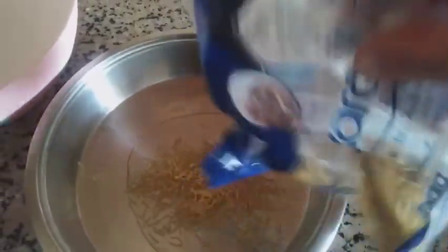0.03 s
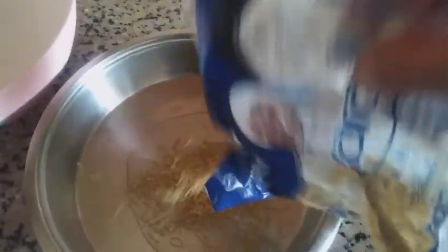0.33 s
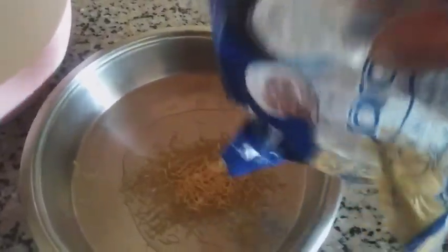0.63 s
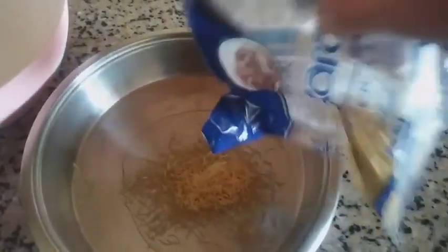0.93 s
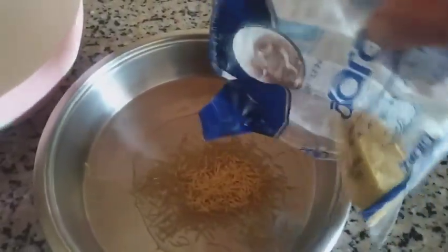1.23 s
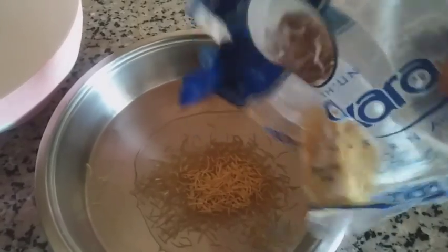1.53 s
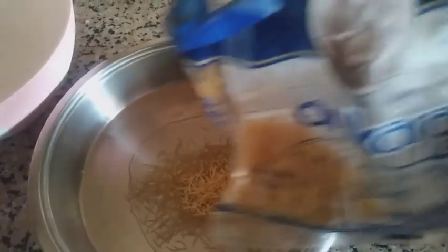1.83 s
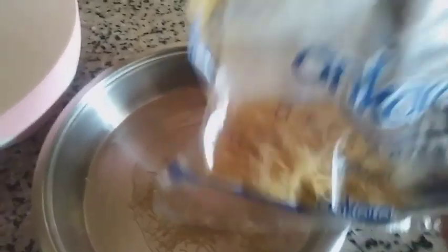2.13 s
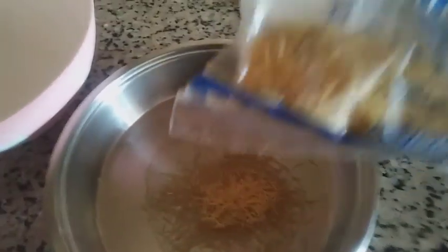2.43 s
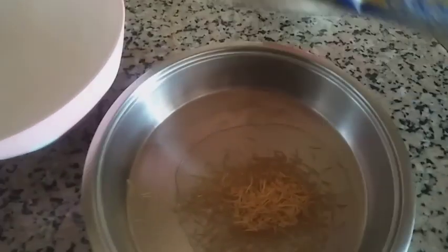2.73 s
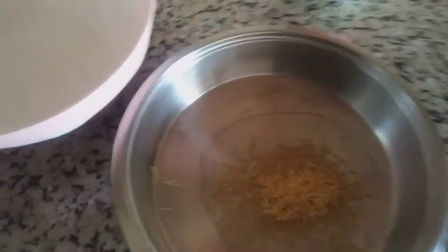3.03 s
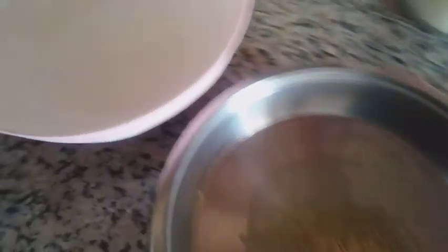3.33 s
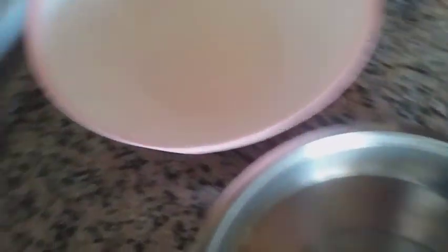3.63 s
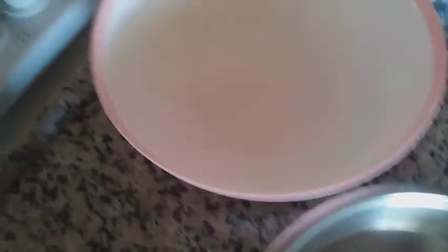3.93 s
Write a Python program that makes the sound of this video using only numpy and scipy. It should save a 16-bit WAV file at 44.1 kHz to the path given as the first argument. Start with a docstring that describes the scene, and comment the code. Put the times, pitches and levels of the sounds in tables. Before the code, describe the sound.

Close up in a small kitchen, dry noodles rattle in short bursts into a lightly ringing steel pan. The plastic bag crackles, leftover noodles slide back inside it, and it drops onto a stone counter.

```python
"""A small kitchen with hard walls, one microphone close to a steel pan; an appliance hums faintly.
Dry noodles are shaken from a plastic bag, each shake a swarm of tiny contacts that rings the pan.
The bag is tipped upright and the rest slides back; the film crinkles, snaps and knocks
as it is carried. Then the bag lands on the stone counter and its contents settle."""
import sys
import numpy as np
from scipy import signal
from scipy.fft import rfft, irfft
from scipy.io import wavfile
from scipy.ndimage import uniform_filter1d

SR = 44100
rng = np.random.default_rng(int(sys.argv[2]) if len(sys.argv) > 2 else 0)


def digitize_waveform(pressure):
    """Quantize a signal to 16-bit integers and store it at the path in sys.argv[1].

    Rows of a 2-D input are taken as channels; values are limited to [-1, 1].
    """
    field = np.atleast_2d(pressure).T
    bounded = np.clip(field, -1, 1)
    quanta = np.round(bounded * 32767).astype(np.int16)
    wavfile.write(sys.argv[1], SR, quanta)


N = 176400
T = np.arange(N) / SR

# Levels in a table are relative to one another; each source then sets its own gain.
# Shakes of the bag, a slide and then a rush: rush_s, rush_db, slide_db, rush_half_length_s
BAG_SHAKES = [(0.161, -14.5, -20.5, 0.016), (0.354, -15, -22.5, 0.021), (.548, -14.5, -19.5, 0.017),
              (0.741, -21, -23, 0.013), (0.906, -20.5, -26, 0.011), (1.072, -20, -25, 0.018),
              (1.206, -25.5, -43, 0.0098)]
# Trickle between the shakes: time_s, level_db
TRICKLE_CURVE = [(0, -20.5), (.04, -24.5), (.44, -23), (.62, -28), (.79, -29.5), (.87, -25.5), (.95, -28.5),
                 (1.16, -27.5), (1.25, -36.5), (1.35, -37), (1.42, -57)]
# Modes of the steel pan: pitch_hz, width_hz, level_db
STEEL_MODES = [(724, 54, -17), (1290, 63, 3.5), (1600, 48, 1.5), (2240, 78, -6), (3110, 150, -1.5),
               (3570, 110, -6), (4070, 200, -5), (4400, 260, -0.5), (4880, 110, -2), (5530, 90, -1)]
# Snaps of the film and two soft, low knocks:
# start_s, level_db, pitch_hz, second_pitch_hz, second_ring_db, thud_db
SNAPS_AND_KNOCKS = [(0.497, -5.5, 3200, 2250, -8, -31), (0.727, -14, 4410, 2150, 2, -33),
                    (1.159, -25, 4400, 3100, -4, -47), (1.191, -17, 2940, 2290, 1, -36),
                    (1.296, -8.5, 2280, 4840, 4, -52), (1.325, -23.5, 1250, 4070, -3, -20.5),
                    (1.35, -21.5, 1950, 990, -4.5, -25), (1.403, -17.5, 2180, 2070, -5, -51),
                    (1.454, -29.5, 1830, 1250, 1, -32), (1.489, -15, 2240, 1570, -7, -37),
                    (1.569, -35, 270, 2320, -7, -16), (1.589, -18, 2050, 3120, -0.5, -37),
                    (1.671, -30.5, 324, 555, -2.5, -13), (1.814, -9.5, 2330, 2720, -5, -50),
                    (1.826, -12, 3110, 3700, -4, -42), (1.929, -9, 2140, 2400, -9, -54),
                    (2.372, -6.5, 2500, 3380, 0, -36), (2.384, -24, 2150, 810, -6, -15),
                    (2.408, -16, 1600, 4700, -8, -34), (2.447, -18.5, 1890, 1390, -1, -23),
                    (2.583, -11.5, 4200, 1720, -3.5, -31), (2.601, -14, 1840, 5240, -4, -24),
                    (2.622, -7, 2100, 1600, -3.5, -34), (2.793, -10, 3060, 1780, -3, -24),
                    (2.843, -16.5, 4540, 2200, -1, -36), (2.858, -20.5, 2530, 1750, -5, -28),
                    (2.926, -21, 3700, 4600, -3, -27), (2.946, -18, 2040, 3800, 1, -30),
                    (3.021, -16, 3310, 4260, -7, -22.5), (3.06, -19, 1620, 2590, -1, -20.5),
                    (3.126, -18.5, 3600, 2200, 1, -45), (3.15, -19.5, 1730, 3600, 1, -42),
                    (3.292, -19.5, 3800, 2900, -4, -36), (3.349, -21.5, 2800, 5680, 3.5, -45),
                    (3.41, -17, 1430, 2750, -3.5, -19), (3.494, -19.5, 2600, 4000, 1, -26),
                    (3.562, -15.5, 1690, 4100, -2, -32)]
# Flexes of the film: centre_s, level_db, half_length_s
FILM_FLEXES = [(1.297, -32, .003), (1.352, -42, 0.013), (2.423, -31, 0.014), (2.625, -38.5, 0.02),
               (2.792, -37.5, 0.0067), (2.862, -39.5, 0.02), (2.957, -31, 0.012), (3.046, -30.5, 0.02),
               (3.103, -35.5, 0.012), (3.16, -34, 0.024), (3.251, -34.5, 0.019), (3.335, -42.5, 0.017),
               (3.424, -44, .02), (3.499, -36, 0.0051), (3.77, -31, 0.0057), (3.846, -39.5, 0.018),
               (3.972, -46.5, 0.011)]
# Noodles sliding inside the raised bag: time_s, level_db
SLUMP_CURVE = [(1.46, -60), (1.55, -37.5), (1.66, -32), (1.71, -29.5), (1.78, -26.5), (1.85, -23.5),
               (1.905, -25), (1.945, -22.5), (2.005, -32), (2.09, -19), (2.155, -17), (2.22, -21.5),
               (2.272, -34), (2.33, -25.5), (2.43, -35), (2.48, -36), (2.62, -39.5), (2.68, -57)]
# Resonance of the bag's hollow, sinking as it fills: time_s, pitch_hz
HOLLOW_PITCH = [(1.7, 2370), (2.0, 2430), (2.15, 1930), (2.25, 1720), (2.6, 1720)]
# Clumps tumbling to the bottom of the bag: centre_s, level_db, half_length_s
CLUMP_FALLS = [(1.706, -26, 0.008), (1.821, -23.5, .007), (1.87, -27.5, 0.014), (1.938, -28, 0.0048),
               (2.148, -20, 0.019), (2.222, -24.5, 0.016)]

# Tone of each source: frequency_hz, gain_db
AIR_TONE = [(25, 12), (60, -4.5), (150, 0), (350, 5.5), (550, -7), (720, 2), (1000, -8.5), (1600, -3),
            (4000, -6.5), (9000, -9), (15000, -6)]  # room air
SLIDE_TONE = [(100, -28), (280, -15), (450, -14), (950, -8.5), (1550, -5.5), (2100, 2.5), (3100, 1),
              (3650, -3), (4400, 2), (5600, -3.5), (9000, -5), (15000, -5.5)]  # noodles sliding over film
RUSH_TONE = [(100, -33), (280, -14), (450, -18), (950, -5.5), (1550, -5), (2100, 2.5), (3800, 1.5),
             (5600, 0), (9000, -4.5), (15000, -2)]  # noodles rushing into the pan
SNAP_TONE = [(150, -24), (800, -6), (2000, 5.5), (4800, 2), (9000, -3.5), (15000, -16)]  # crack and flutter of the film
FILM_TONE = [(100, -14), (300, -2), (600, -8), (1150, -4), (1550, 3), (2600, -1), (4000, 3), (5600, -6.5),
             (9000, -5), (15000, -11)]  # rustling film
SLUMP_TONE = [(100, -32), (280, -18), (550, -13), (900, -5), (1200, -7), (1700, -0.5), (2900, -1.5),
              (4400, 2), (5600, -2), (9000, -2), (15000, -2.5)]  # noodles running back
CLUMP_TONE = [(100, -22), (300, -15), (600, -8.5), (900, 0), (1600, -1), (2400, 5), (4000, -10),
              (12000, -15)]  # falling clumps
LANDING_TONE = [(40, -47), (110, -33), (210, -3), (430, -5.5), (650, -2), (1100, -6), (1600, 4), (2600, 0),
                (4100, 1.5), (5600, -3.5), (9000, -3.5), (15000, -5)]  # bag on stone
# The microphone, whose port cancels the upper treble: frequency_hz, gain_db
MIC_RESPONSE = [(25, -25), (55, -7), (110, 0), (5500, 0.5), (6400, -4.5), (6950, -12), (7320, -25.5),
                (7700, -16.5), (8500, -16), (11500, -19), (15500, -23)]


def from_db(db):
    """Decibels to gain."""
    return 10 ** (np.asarray(db) / 20)


def rms_one(x):
    """Scale to unit rms."""
    return x / np.sqrt(np.mean(x ** 2) + 1e-20)


def level(curve):
    """Gain along a (time_s, level_db) curve, opening 30 ms early and silent after its end."""
    times, db = np.transpose(curve)
    return from_db(np.interp(T, times, db)) * (T >= times[0] - .03) * (T <= times[-1])


def swell(centre_s, db, half_s):
    """Power of a bell-shaped swell."""
    return from_db(db) ** 2 * np.exp(-.5 * ((T - centre_s) / half_s) ** 2)


def decay(t, t60_s):
    """Exponential decay from time zero, full level before it."""
    return from_db(-60 * np.maximum(t, 0) / t60_s)


def colour(x, tone):
    """Minimum-phase filter through (frequency_hz, gain_db) points."""
    hz, db = np.transpose(tone)
    grid_hz = np.maximum(np.fft.rfftfreq(8192, 1 / SR), 1)
    gain = from_db(np.interp(np.log(grid_hz), np.log(hz), db))
    cepstrum = irfft(np.log(gain))
    half = len(cepstrum) // 2
    cepstrum[1:half] *= 2
    cepstrum[half + 1:] = 0
    impulse = irfft(np.exp(rfft(cepstrum)))[:half]
    return signal.oaconvolve(x, impulse)[:len(x)]


def resonance(x, hz, width_hz):
    """Two-pole resonance with unit gain at its peak."""
    radius = np.exp(-np.pi * width_hz / SR)
    feedback = [1, -2 * radius * np.cos(2 * np.pi * hz / SR), radius ** 2]
    return signal.lfilter(np.array([1, 0, -1]) * (1 - radius ** 2) / 2, feedback, x + 1e-18)


def contacts(tone, per_s, spread_db, q, click=.25):
    """A steady swarm of tiny contacts of random size, each ringing briefly, high pitches more often."""
    pitches_hz = np.geomspace(250, 14000, 16)
    share = pitches_hz ** .6 / np.sum(pitches_hz ** .6)
    sizes = from_db(spread_db * np.minimum(rng.exponential(1, N), 4)) * rng.choice([-1, 1], N)
    clicks = sizes * (rng.random(N) < per_s / SR)
    pitch_index = np.searchsorted(np.cumsum(share), rng.random(N))
    rings = sum(resonance(clicks * (pitch_index == k), hz, hz / q) / np.sqrt(share[k])
                for k, hz in enumerate(pitches_hz))
    swarm = colour(rings + click * clicks, tone)
    power_at_mic = uniform_filter1d(colour(swarm, MIC_RESPONSE) ** 2, size=1300)
    return swarm / np.sqrt(power_at_mic + power_at_mic.mean() / 20)


def room_tone(hum_hz=98):
    """Room air and the wavering hum of an appliance, behind everything else."""
    waver = rms_one(resonance(rng.standard_normal(N), hum_hz, width_hz=9.9))
    hum = np.sqrt(2) * np.sin(2 * np.pi * hum_hz * T) + 0.7 * waver
    air = rms_one(colour(rng.standard_normal(N), AIR_TONE))
    return from_db(-44.5) * air + from_db(-59.5) * hum


def noodle_pour(slide_lead_s=0.061):
    """Each shake slides noodles over the film, then they rush into the ringing pan; single ends tick."""
    slide_power = level(TRICKLE_CURVE) ** 2
    slide_power += sum(swell(s - slide_lead_s, db, half_s=0.021) for s, _, db, _ in BAG_SHAKES)
    rush_power = sum(swell(s, db, half_s) for s, db, _, half_s in BAG_SHAKES)
    slides = np.sqrt(slide_power) * contacts(SLIDE_TONE, per_s=9000, spread_db=2.5, q=3.5, click=0.66)
    rushes = np.sqrt(rush_power) * contacts(RUSH_TONE, per_s=9000, spread_db=2.5, q=2.8, click=0.73)
    ticks = np.sqrt(slide_power) * contacts(SLIDE_TONE, per_s=420, spread_db=3, q=7, click=0.34)
    noodles = slides + rushes + from_db(-5.5) * ticks
    pan = sum(from_db(db) * resonance(noodles, hz, width_hz) for hz, width_hz, db in STEEL_MODES)
    return from_db(-2) * (noodles + from_db(-3.5) * pan)


def snaps_and_knocks(snap_delay_s=0.001686, rise_s=0.00058, crack_s=0.0016, ring_cycles=22.5):
    """The film snaps or knocks: a crack, two short rings of its panels, a flutter and a soft thud."""
    track, t = np.zeros(N + SR), T[:SR // 8]
    rise = 1 - np.exp(-(t / rise_s) ** 2)
    for start_s, db, hz, second_hz, second_db, thud_db in SNAPS_AND_KNOCKS:
        crack, flutter, thud = rng.standard_normal((3, len(t)))
        ring = np.sin(2 * np.pi * hz * t) + from_db(second_db) * np.sin(2 * np.pi * second_hz * t)
        ring *= decay(t, t60_s=ring_cycles / np.sqrt(hz * second_hz))
        crack *= from_db(-14.5) * np.exp(-t / crack_s)
        flutter *= from_db(-18.5) * decay(t, t60_s=0.045)
        burst = 2 * colour(crack + flutter, SNAP_TONE)
        for _ in range(2):
            thud = resonance(thud, hz=290, width_hz=440)
        thud = from_db(thud_db + 6.5) * rms_one(thud) * decay(t, t60_s=0.049)
        start = int((start_s + snap_delay_s) * SR)
        track[start:start + len(t)] += from_db(db + 1) * rise * (ring + burst + thud)
    return track[:N]


def film_crinkle():
    """Flexed film gives a soft, dense rustle of small crackles."""
    flex_power = sum(swell(*flex) for flex in FILM_FLEXES)
    return np.sqrt(flex_power) * contacts(FILM_TONE, per_s=5200, spread_db=4, q=4.4, click=.28)


def noodle_slump(hollow_width_hz=660):
    """The remaining noodles run back down the bag, coloured by its hollow, and drop in dull clumps."""
    slide = level(SLUMP_CURVE) * contacts(SLUMP_TONE, per_s=9000, spread_db=3.5, q=2.7, click=0.61)
    # A gliding resonance: shift the hollow's pitch to zero, low-pass, shift back.
    hollow_hz = np.interp(T, *np.transpose(HOLLOW_PITCH))
    carrier = np.exp(2j * np.pi * np.cumsum(hollow_hz) / SR)
    pole = np.exp(-np.pi * hollow_width_hz / SR)
    hollow = 2 * np.real(carrier * signal.lfilter([1 - pole], [1, -pole], slide / carrier + 1e-18))
    clump_power = sum(swell(*fall) for fall in CLUMP_FALLS)
    clumps = np.sqrt(clump_power) * contacts(CLUMP_TONE, per_s=6000, spread_db=4.5, q=2.6, click=0.38)
    return from_db(-3.5) * (slide + from_db(3) * hollow) + clumps


def bag_landing(drag_start_s=3.538, land_s=3.624):
    """The bag drags on the counter, drops with a crunch and a bump, and its contents shift and settle."""
    drag_rise_s, attack_s, hold_s = 0.031, 0.004, 0.012
    bump_hz, bump_delay_s = 194, 0.0078
    t = T - land_s
    drag = from_db(-26.5) * np.clip((T - drag_start_s) / drag_rise_s, 0, 1) ** 2 * (t < 0)
    hit = from_db(-8) * np.clip(t / attack_s, 0, 1) * decay(t - hold_s, t60_s=0.11)
    settle = from_db(-23.5) * (t >= 0) * decay(t, t60_s=0.51)
    press_power = swell(land_s, db=-23, half_s=0.0095)
    envelope = np.sqrt(drag ** 2 + press_power + hit ** 2 + settle ** 2)
    crunch = envelope * contacts(LANDING_TONE, per_s=16000, spread_db=2, q=1.8, click=0.62)
    shift_power = swell(centre_s=3.727, db=-28, half_s=0.019)
    shift = np.sqrt(shift_power) * contacts(SLIDE_TONE, per_s=9000, spread_db=2.5, q=3.1)
    bump_age = np.maximum(t - bump_delay_s, 0)
    bump = from_db(-27) * np.sin(2 * np.pi * bump_hz * bump_age) * decay(bump_age, t60_s=0.07)
    return crunch + shift + bump


def kitchen_walls(direct, gap_s=0.00516):
    """Dense reflections from hard walls reach the microphone just after the direct sound."""
    t = T[:SR // 2]
    tail = rng.standard_normal(len(t)) * decay(t, t60_s=0.34) * (t > gap_s)
    tail /= np.sqrt(np.sum(tail ** 2))
    return direct + from_db(-13.5) * signal.fftconvolve(direct, tail)[:N]


def scene():
    """The kitchen from the microphone's position, in mono: noodles and bag close, room tone behind."""
    direct = noodle_pour() + noodle_slump() + film_crinkle() + snaps_and_knocks() + bag_landing()
    return (kitchen_walls(direct) + room_tone())[None]


def record(dry):
    """The microphone dulls the upper treble; peaks clip at full scale ahead of a steep top cut."""
    clipped = np.clip(colour(dry[0], MIC_RESPONSE), -1, 1)
    top_cut = signal.firwin(401, cutoff=15800, fs=SR, window="blackman")
    return signal.fftconvolve(clipped, top_cut, "same")[None]


dry = scene()
out = record(dry)
digitize_waveform(out)
```